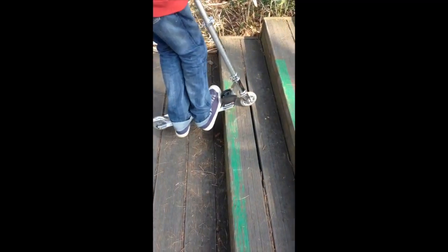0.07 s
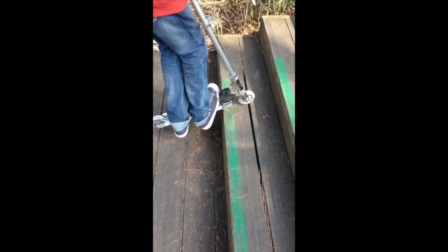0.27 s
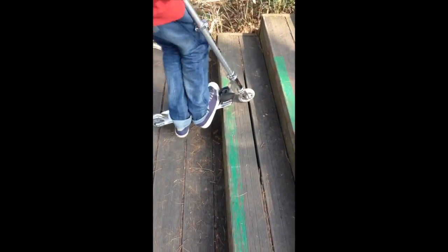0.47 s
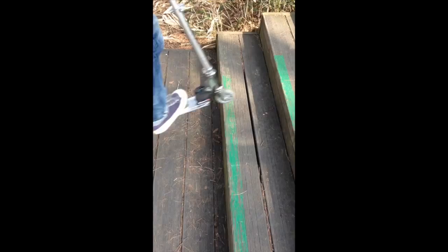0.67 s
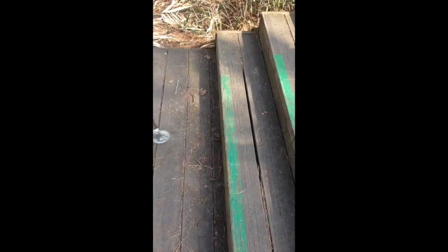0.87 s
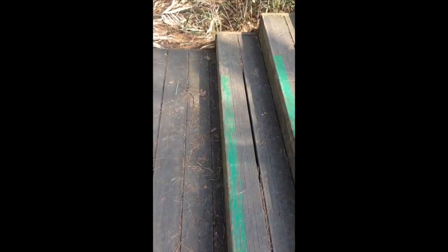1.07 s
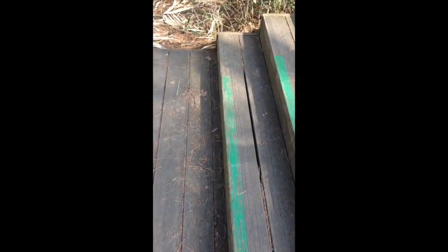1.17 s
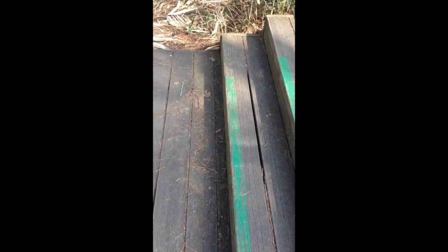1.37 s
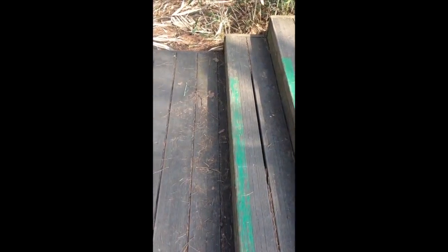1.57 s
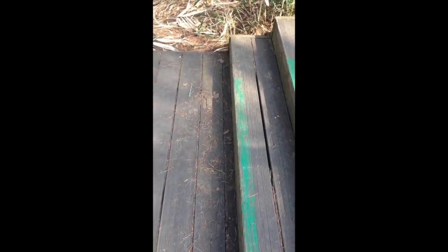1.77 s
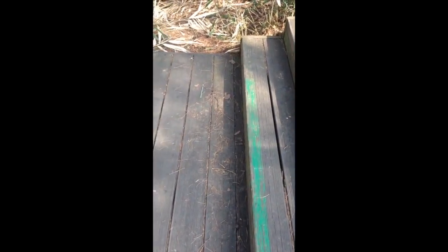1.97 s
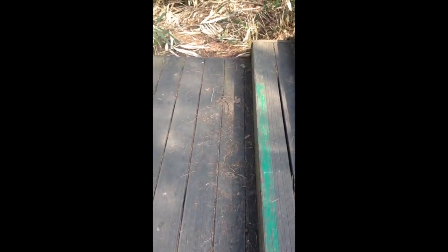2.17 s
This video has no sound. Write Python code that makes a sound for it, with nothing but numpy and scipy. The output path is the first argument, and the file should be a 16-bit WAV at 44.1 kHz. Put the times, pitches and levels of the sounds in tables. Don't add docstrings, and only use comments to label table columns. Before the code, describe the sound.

A kick scooter descends hollow wooden steps outdoors. A light clack and low plank thump open, fading by 0.2 s; tiny bearing squeaks follow at 0.2-0.4 s. Small ticks lead to a metallic knock at 0.63 s. At 0.86-0.9 s it slams down, planks booming, frame cracking. Whirring and sparse rattles fade until 1.6 s; a looser, longer clatter comes at 2.0-2.2 s over faint steady hiss.

```python
import sys
import numpy as np
from scipy import signal
from scipy.fft import rfft, irfft
from scipy.io import wavfile
from scipy.ndimage import uniform_filter1d

SR = 44100
rng = np.random.default_rng(int(sys.argv[2]) if len(sys.argv) > 2 else 0)


def wrap_up_sound(samples):
    columns = np.atleast_2d(samples).T
    tamed = np.clip(columns, -1, 1)
    steps = np.round(tamed * 32767).astype(np.int16)
    wavfile.write(sys.argv[1], SR, steps)


def elevation(decibels):
    levels = np.asarray(decibels, float)
    return 10 ** (levels / 20)


N = 97328

MODE_CHANCE_DB = 2.5


def rms_one(x):
    return x / np.sqrt(np.mean(x ** 2) + 1e-20)


def at_hz(points, hz):
    table_hz, table_db = np.transpose(points)
    return np.interp(np.log(hz), np.log(table_hz), table_db)


def ring(force, hz, t60_s):
    radius = elevation(-60 / (t60_s * SR))
    w = 2 * np.pi * hz / SR
    return signal.lfilter([0, np.sin(w)], [1, -2 * radius * np.cos(w), radius ** 2], force + 1e-18)


def near(hz, centre_hz, octaves):
    return 1 / (1 + (np.log2(hz / centre_hz) / octaves) ** 2)


def bell(start_s, length_s):
    return np.sin(np.pi * np.clip((np.arange(N) / SR - start_s) / length_s, 0, 1))


def flutter(depth=.7):
    waver = rms_one(uniform_filter1d(rng.standard_normal(N), size=45))
    return np.sqrt(1 - depth ** 2) + depth * waver


def air():
    # f/Hz, level/dB
    air_spectrum = [(18, -69), (30, -15.5), (455, -2), (767, -4.5), (1020, -3.5), (1170, -4.5), (3590, -15),
                    (10200, -29.5), (15500, -42)]
    level_db = -62
    hz = np.arange(1, N // 2 + 2) * SR / N
    spectrum = rfft(rng.standard_normal(N)) * elevation(at_hz(air_spectrum, hz))
    return elevation(level_db) * rms_one(irfft(spectrum, N))


def echoes(x):
    t60_s, level_db, gap_s, cut_hz = 0.18, -28, .004, 18000
    t = np.arange(SR // 4) / SR
    tail = rng.standard_normal(len(t)) * elevation(-60 * t / t60_s) * (t > gap_s)
    tail = signal.sosfilt(signal.butter(1, cut_hz, fs=SR, output="sos"), tail)
    tail /= np.sqrt(np.sum(tail ** 2))
    return elevation(level_db) * signal.fftconvolve(x, tail)[:N]


def bearings():
    # t/s, length/s, start f/Hz, level/dB
    squeaks = [
        (.218, .037, 6300, -66),
        (.33, .06, 5900, -71),
        (.33, .03, 6900, -76),
    ]
    # t/s, length/s, f/Hz, level/dB
    whirrs = [
        (.9, .09, 7200, -59),
        (1.06, .1, 6900, -67),
        (1.13, .09, 6500, -73),
        (1.23, .11, 7100, -71),
    ]
    glide_per_s, low_ratio, low_db = 3.8, .57, -3
    half_width_hz = 350
    t, out = np.arange(N) / SR, np.zeros(N)
    for start_s, length_s, hz, db in squeaks:
        phase = 2 * np.pi * hz * (t - start_s + glide_per_s * (t - start_s) ** 2 / 2)
        tone = np.sin(phase) + elevation(low_db) * np.sin(low_ratio * phase)
        out += elevation(db) * bell(start_s, length_s) * tone * flutter(.35)
    noise = rng.standard_normal(N)
    for start_s, length_s, hz, db in whirrs:
        edges_hz = [hz - half_width_hz, hz + half_width_hz]
        band = signal.butter(2, edges_hz, "band", fs=SR, output="sos")
        breath = rms_one(signal.sosfilt(band, noise))
        out += elevation(db) * bell(start_s, length_s) * flutter() * breath
    return out


def planks():
    # t/s, peak level/dB, centre of excited modes f/Hz
    thumps = [(.003, -26, 195), (0.054, -36, 243), (0.533, -55, 241), (.634, -37, 157), (0.859, -14.5, 306),
              (.869, -10.5, 213), (0.893, -8.5, 357), (1.068, -42, 165), (1.151, -34.5, 203),
              (1.367, -38.5, 200), (1.404, -39.5, 223), (1.179, -44.5, 170), (1.46, -48, 198),
              (1.499, -48.5, 182), (1.569, -48.5, 149), (1.993, -41, 176), (2.032, -61, 242),
              (2.086, -33, 193), (2.112, -38, 181)]
    # t/s, level/dB
    roll_levels = [(0, -31), (0.089, -43), (0.201, -55), (.5, -60), (.54, -46), (.7, -53), (.85, -56.5),
                   (.9, -29), (1.04, -43.5), (1.12, -53), (1.2, -57.5), (1.33, -54), (1.4, -49.5),
                   (1.58, -57), (1.64, -66.5), (1.98, -64.5), (2.019, -42), (2.2, -52.5)]
    # f/Hz, level/dB, t60/s
    plank_modes = [(120.6, -7, 0.39), (156, 9, 0.095), (177.1, -11, 0.39), (199.8, 1, 0.072),
                   (248.7, -4.5, 0.19), (280.4, -2.5, 0.22), (321, -3.5, 0.13), (382, -6.5, 0.082),
                   (422, -16.5, 0.17), (544, 7.5, 0.016), (677, -56.5, 0.11)]
    thump_trim_db, roll_trim_db, spread_octaves = -7.5, -37.0, 0.31
    low_cut_hz, tyre_cut_hz = 125, 446
    blow_s, blow_db, centre_hz = np.transpose(thumps)
    roll_s, roll_db = np.transpose(roll_levels)
    roll = elevation(np.interp(np.arange(N) / SR, roll_s, roll_db) + roll_trim_db)
    blow_at = (blow_s * SR).astype(int)
    out = np.zeros(N)
    for hz, level_db, t60_s in plank_modes:
        chance_db = rng.normal(0, MODE_CHANCE_DB, len(blow_s))
        force = roll * rng.standard_normal(N)
        force[blow_at] -= elevation(blow_db + thump_trim_db + chance_db) * near(hz, centre_hz, spread_octaves)
        out += elevation(level_db) * ring(force, hz, t60_s)
    out = signal.sosfilt(signal.butter(3, low_cut_hz, "high", fs=SR, output="sos"), out)
    return signal.sosfilt(signal.butter(2, tyre_cut_hz, fs=SR, output="sos"), out)


def pings():
    # t/s, peak level/dB, f/Hz, t60/s
    part_pings = [(0.634, -42, 2400, 0.084), (0.8937, -18.5, 179.3, 0.096), (1.993, -30, 3800, 0.026),
                  (.568, -37, 6100, 0.0098), (.8605, -7.5, 306, 0.014), (.863, -24, 2170, 0.013),
                  (.8728, -15, 5700, 0.01), (.873, -15, 2380, 0.011), (.877, -32, 2097, 0.023),
                  (.952, -43.5, 3270, 0.019), (.99, -52, 3120, 0.021), (1.109, -43.5, 6260, 0.02),
                  (0.8994, -21, 156, 0.18), (1.143, -35.5, 6570, 0.018), (1.232, -63, 7500, 0.075),
                  (1.367, -48.5, 2440, 0.028), (1.367, -51.5, 1290, 0.027), (1.6, -49, 2206, 0.045),
                  (1.6, -43.5, 5040, 0.016), (1.9937, -20, 2900, 0.014), (1.995, -35.5, 5500, 0.049),
                  (1.996, -33.5, 7150, 0.028), (1.997, -45, 1280, 0.047), (2.005, -45, 6220, 0.1),
                  (2.034, -26.5, 2120, 0.023), (2.084, -27, 1790, 0.024), (2.088, -37, 3640, 0.037),
                  (2.09, -48.5, 1357, 0.14), (2.112, -38.5, 7320, 0.036), (2.132, -44, 2084, 0.063),
                  (0.00806, -33.5, 174.5, 0.2), (.057, -35.5, 203, 0.085), (.073, -39.5, 155, .12),
                  (1.008, -42, 177.2, 0.19), (1.09, -50, 150, .15), (1.995, -49, 170, 0.14),
                  (2.115, -44.5, 167, 0.11), (2.034, -45, 600, 0.052), (1.995, -40.5, 1230, 0.036),
                  (2.165, -54, 180, 0.069), (.915, -27, 294, 0.082), (.893, -18, 391, 0.048),
                  (.005, -41, 349, 0.057), (2.084, -39, 161.5, 0.085), (.862, -31, 978, 0.028),
                  (.548, -50, 7900, 0.014), (.586, -50, 5430, 0.017), (0.616, -53, 12100, .012),
             (0.634, -32.5, 6060, 0.014), (.658, -45.5, 6000, 0.027), (0.631, -42, 1090, 0.055),
             (.862, -34, 6800, 0.012), (.899, -33.5, 7130, 0.017), (1.107, -48.5, 10800, 0.02),
             (1.108, -48, 13300, 0.016), (1.112, -53, 9230, 0.048), (1.1083, -42, 7630, 0.018),
             (1.143, -49, 13000, .015), (1.158, -53, 1810, 0.015), (1.231, -55, 14800, .015),
             (1.995, -37.5, 6840, 0.036), (2.033, -43, 2826, 0.03), (2.034, -39.5, 4027, .04),
             (2.034, -42, 6700, 0.033), (2.13, -44, 1000, 0.036), (2.129, -41, 8800, .02)]
    rise_s, trim_db = 0.0018, 6.5
    out = np.zeros(N)
    for start_s, db, hz, t60_s in part_pings:
        t = np.maximum(np.arange(N) / SR - start_s, 0)
        decay = elevation(db + trim_db - 60 * np.minimum(t / t60_s, 4))
        tone = decay * (1 - np.exp(-t / rise_s)) * np.sin(2 * np.pi * hz * t)
        if hz > 1000:
            tone = tone * flutter(min(hz / 9000, .7))
        out += tone
    return out


def frame():
    # t/s, peak level/dB, struck part f/Hz, burst t60/s
    clacks = [(.0005, -31, 6500, 0.067), (.013, -32, 2500, 0.038), (.021, -43.5, 2520, 0.11),
              (0.065, -42, 1800, 0.067), (0.096, -45, 1900, 0.065), (0.128, -46, 5630, 0.071),
              (0.262, -54.5, 9140, 0.044), (0.416, -37, 5400, 0.0096), (0.526, -42.5, 3900, 0.041),
              (.533, -50, 6000, 0.025), (0.547, -45, 6350, 0.057), (0.568, -39, 5500, 0.042),
              (.586, -37.5, 8340, 0.061), (.617, -40, 9000, 0.033), (0.63, -23.5, 3070, 0.037),
              (.635, -25, 4480, .06), (.678, -42, 5000, .08), (0.653, -30.5, 2400, 0.14),
              (.861, -15, 2380, 0.06), (0.8729, -4, 3960, 0.019), (0.875, -19, 3040, 0.089),
              (0.8928, -7.5, 2970, 0.035), (0.897, -18.5, 7500, 0.11), (0.904, -25, 7000, 0.068),
              (.914, -36, 5040, 0.069), (0.951, -37.5, 3220, 0.11), (0.989, -40.5, 2820, 0.11),
              (1.011, -30.5, 4900, 0.037)]
    # t/s, peak level/dB, centre f/Hz, burst t60/s
    rattles = [(1.1062, -31, 9000, 0.02), (1.113, -48, 8040, 0.23), (1.14, -50, 5000, .03),
               (1.146, -48, 6900, 0.068), (1.159, -34.5, 2220, 0.048), (1.172, -44, 3920, 0.024),
               (1.2298, -35, 6000, 0.027), (1.291, -40.5, 3900, 0.022), (1.365, -36, 2580, 0.03),
               (1.407, -39.5, 1480, 0.022), (1.48, -49, 9500, 0.026), (1.598, -32.5, 4560, 0.048),
               (1.9945, -18.5, 3900, 0.079), (2.0, -30, 3270, 0.087), (2.031, -23, 3020, 0.041),
               (2.035, -21.5, 3560, 0.058), (2.043, -36.5, 2540, 0.24), (2.082, -21, 2900, 0.052),
               (2.088, -32, 2700, 0.17), (2.11, -33.5, 7500, 0.17), (2.13, -29.5, 3120, 0.13),
               (2.14, -39.5, 2360, 0.29), (2.189, -40.5, 7400, 0.057)]
    # t/s, peak level/dB, centre f/Hz, burst t60/s
    scrapes = [
        (.001, -30.5, 960, 0.12),
        (0.527, -39.5, 1350, 0.2),
        (0.564, -41, 1440, 0.35),
        (0.635, -35, 1080, 0.1),
        (.862, -56, 700, 0.15),
        (0.893, -15.5, 730, 0.15),
        (2.036, -72, 700, .1),
        (2.084, -67, 700, 0.084),
    ]
    # f/Hz, density/dB per Hz
    crack_spectrum = [(300, 12.5), (1000, 3.5), (2500, -2.5), (6000, -5), (8000, -3.5), (10000, -10.5),
                      (15000, -10.5)]
    # f/Hz, level/dB, t60/s
    tube_modes = [(1167, -6, 0.026), (1328, -23, 0.1), (1855, -1, 0.043), (2096, 5.5, 0.027),
                  (2400, -12.5, 0.018), (2826, -4, 0.049), (3070, -2.5, 0.021), (3740, -4.5, 0.031),
                  (4027, -19.5, 0.076), (4567, -7, 0.023), (5090, -24.5, 0.016), (6090, -2, 0.074),
                  (6850, -10, 0.084), (7420, 0, 0.05)]
    touches_per_s, smooth_share, rise_s = 2500, .5, 0.0011
    spread_octaves, crack_db, modes_db = 0.61, -2.5, -41
    size = SR // 4
    t = np.arange(size) / SR
    mode_hz = np.array(tube_modes)[:, 0]
    crack, force = np.zeros(N + size), np.zeros((len(mode_hz), N + size))
    onset = (1 + 0.77 * np.exp(-t / 0.0007)) * (1 - np.exp(-t / rise_s))
    for start_s, db, centre_hz, t60_s in [*clacks, *rattles, *scrapes]:
        hit = rng.random(size) < touches_per_s / SR
        touch = hit * 2 * rng.random(size) + smooth_share
        burst = rms_one(touch * rng.standard_normal(size)) * elevation(db - 60 * t / t60_s) * onset
        i = int(start_s * SR)
        edges_hz = [centre_hz / 2, min(centre_hz * 1.8, 19000)]
        band = signal.butter(1, edges_hz, "band", fs=SR, output="sos")
        crack[i:i + size] += signal.sosfilt(band, burst)
        strength = elevation(rng.normal(0, MODE_CHANCE_DB, len(mode_hz)))
        share = near(mode_hz, centre_hz, spread_octaves) * strength
        force[:, i:i + size] += share[:, None] * burst
    modes = np.zeros(N + size)
    for k, (hz, db, t60_s) in enumerate(tube_modes):
        modes += (-1) ** k * elevation(db) * ring(force[k], hz, t60_s)
    shape = irfft(elevation(at_hz(crack_spectrum, np.linspace(20, SR / 2, 129))))
    shape = np.roll(shape, 128)[1:]
    crack = np.convolve(crack, signal.minimum_phase(np.convolve(shape, shape)))
    return elevation(crack_db) * crack[:N] + elevation(modes_db) * modes[:N]


def scene():
    metal = frame() + pings()
    return (planks() + metal + echoes(metal) + bearings() + air())[None]


def low_pass(x):
    return signal.sosfilt(signal.butter(12, 15840, fs=SR, output="sos"), x)


def record(dry):
    low_cut_hz, top_cut_hz = 50, 16300
    x = signal.sosfilt(signal.butter(2, low_cut_hz, "high", fs=SR, output="sos"), dry)
    x = 0.69 * np.tanh(x / 0.47)
    x = signal.sosfilt(signal.cheby2(10, 50, top_cut_hz, fs=SR, output="sos"), x)
    return low_pass(x)


dry = scene()
out = record(dry)
wrap_up_sound(out)
```